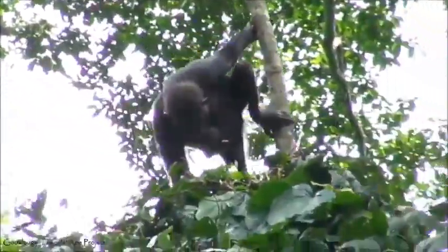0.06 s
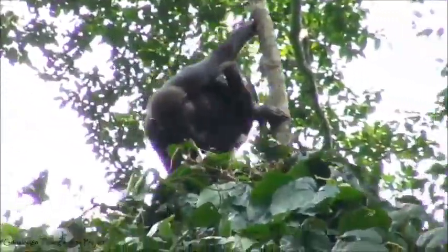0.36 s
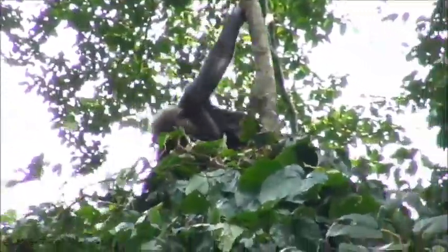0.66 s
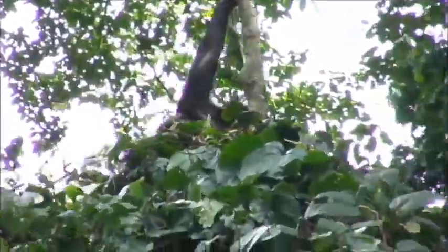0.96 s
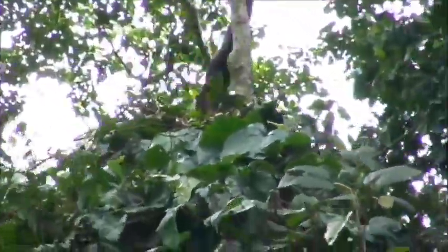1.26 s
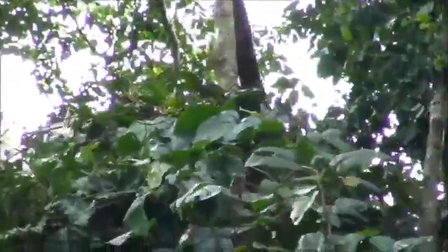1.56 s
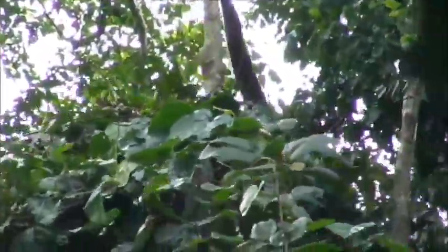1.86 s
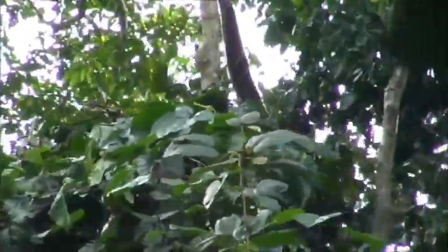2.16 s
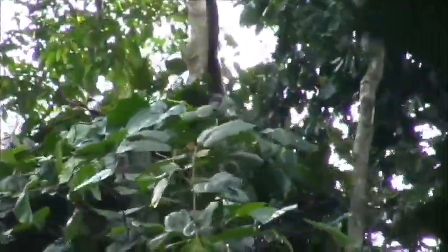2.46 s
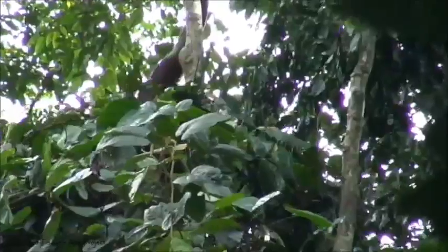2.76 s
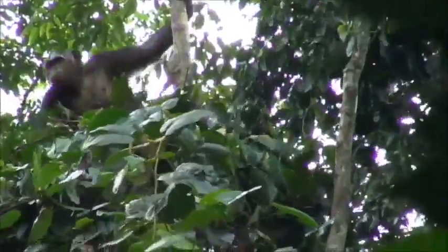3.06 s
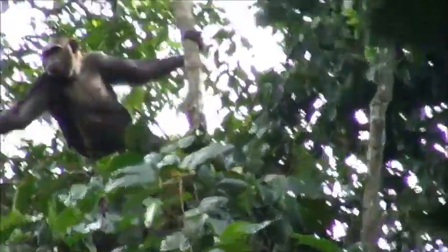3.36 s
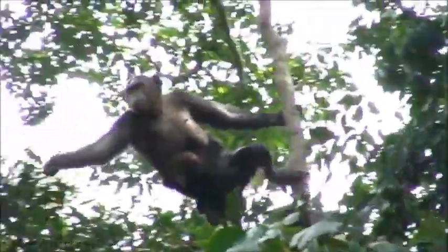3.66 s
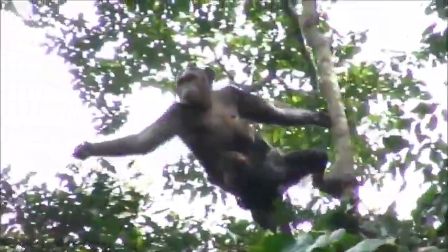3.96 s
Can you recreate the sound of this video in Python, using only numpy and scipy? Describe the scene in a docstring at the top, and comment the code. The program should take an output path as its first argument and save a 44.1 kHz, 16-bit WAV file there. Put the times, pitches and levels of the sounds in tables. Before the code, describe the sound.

A dense, high insect chorus shrills all around the microphone in a rainforest. Crickets trill close on the right, a climbing ape faintly rustles leaves and snaps twigs, and a distant bird calls a few falling notes.

```python
"""Under the rainforest canopy

A dense chorus of insects shrills all round the microphone near 7.5 kHz, over the soft wash of the forest.
Two crickets trill with their wings close by on the right, and a third chirps behind them. Off to the left
are a thin whistle and a low purring trill; a far bird gives falling notes. An ape climbs through the
branches, stirring leaves, making boughs knock and snapping a few twigs."""
import sys
import numpy as np
from scipy import signal
from scipy.fft import rfft, irfft
from scipy.io import wavfile
from scipy.ndimage import uniform_filter1d

SR = 44100
rng = np.random.default_rng(int(sys.argv[2]) if len(sys.argv) > 2 else 0)


def master_out(mix):
    """Clip the mix to full scale and print it as 16-bit PCM to the path in sys.argv[1]."""
    frames = np.transpose(np.atleast_2d(mix))
    ceiling = np.clip(frames, -1, 1)
    pcm = np.round(ceiling * 32767).astype(np.int16)
    wavfile.write(sys.argv[1], SR, pcm)


N = 176400

# Spectrum of rustling leaves. Each row: frequency in Hz, relative level in dB.
LEAF_SPECTRUM = [(500, -12), (2000, -4), (4000, 2.5), (8000, -7), (12000, -6.5), (16000, -21)]


def undb(db):
    """Decibels to gain."""
    return 10 ** (np.asarray(db) / 20)


def unit(x):
    """Scale to rms 1."""
    return x / np.sqrt(np.mean(x ** 2) + 1e-20)


def clock():
    """Time of every sample in seconds."""
    return np.arange(N) / SR


def walk(rate_hz):
    """Smooth random wander of rms 1."""
    window = max(int(SR / rate_hz), 2)
    smoothed = uniform_filter1d(rng.standard_normal(N), window, mode="wrap")
    return unit(uniform_filter1d(smoothed, window, mode="wrap"))


def swell(t, middle, width):
    """A bell-shaped rise and fall."""
    return np.exp(-((t - middle) / width) ** 2)


def strike(t, start, decay):
    """A sudden onset that dies away exponentially."""
    return (t >= start) * np.exp(-np.abs(t - start) / decay)


def bin_hz():
    """Frequency of every spectral bin, at least 1 Hz."""
    return np.maximum(np.fft.rfftfreq(N, 1 / SR), 1)


def across_bins(points):
    """Join (Hz, value) points along a logarithmic frequency axis."""
    hz, values = np.array(points).T
    return np.interp(np.log(bin_hz()), np.log(hz), values)


def colour(x, spectrum):
    """Filter by a spectrum of (Hz, dB) points; rms 1."""
    return unit(irfft(rfft(x) * undb(across_bins(spectrum)), N))


def tone(hz):
    """A sine of rms 1 on a pitch curve."""
    return np.sqrt(2) * np.sin(2 * np.pi * np.cumsum(hz) / SR)


def pan(left_db):
    """Constant-power gains that put the left channel left_db above the right."""
    return unit(undb(np.array([[left_db], [-left_db]]) / 2))


def spread(pair, likeness):
    """Mix two unrelated signals into left and right channels whose correlation is likeness."""
    mid = np.sqrt(1 + likeness) * pair[0]
    side = np.sqrt(1 - likeness) * pair[1]
    return np.array([mid + side, mid - side]) / np.sqrt(2)


def forest(x, wet_db, t60_s=.48):
    """Sound reaches the microphone directly and as a diffuse tail scattered by trunks and leaves."""
    t = np.arange(SR) / SR
    tail = rng.standard_normal((2, SR)) * np.exp(-np.log(1000) * t / t60_s)
    tail /= np.sqrt(np.sum(tail ** 2, axis=1, keepdims=True))
    padded = np.pad(x, (SR, 0), mode="reflect")  # the forest is already ringing at the start
    wet = signal.fftconvolve(padded[None], tail, axes=1)[:, SR:SR + N]
    return (x + undb(wet_db) * wet) / np.hypot(1, undb(wet_db))


def wash(level_db=-49.5, waver_db=.5):
    """The soft, wide noise of the distant forest, leaning left in the low mids and right in the treble."""
    # Colour of the wash. Each row: frequency in Hz, relative level in dB.
    spectrum = [(20, -37), (42, -10.5), (70, -7.5), (120, -4), (200, -0.5), (350, 0), (560, 1), (750, -1),
                (950, 4.5), (1300, -2), (2000, -1), (2700, -5.5), (3600, -8), (5200, -11), (10000, -21),
                (14000, -26), (16000, -50)]
    # Its width. Each row: frequency in Hz, correlation of left and right.
    likeness = [(30, .4), (80, .1), (250, 0.12), (550, 0.24), (1100, 0.13), (2500, 0.23), (14000, 0.38)]
    # Its lean. Each row: frequency in Hz, left over right in dB.
    lean = [(80, -1), (250, 1.5), (700, 1), (1400, 1.5), (2500, -2.5), (6000, -0.5), (14000, -1)]
    lean_db = across_bins(lean)
    air = spread(rfft(rng.standard_normal((2, N))), across_bins(likeness))
    air *= undb(np.array([lean_db, -lean_db]) / 2)
    return colour(irfft(air, N), spectrum) * undb(level_db + waver_db * walk(6.2))


def singers():
    """Single voices each hold one thin, slightly wandering note; the clearest whistles on the left."""
    # Held notes. Each row: pitch in Hz, level in dB, left over right in dB, pitch wander in Hz,
    # scattered over direct sound in dB.
    voices = [(1148, -59, 11, 1.8, -11), (1052, -67, 8, 5, -2), (7468, -58, 0, 6, 0), (2185, -73, -5, 9, 0)]
    return sum(forest(tone(hz + wander_hz * walk(25.4)), wet_db) * undb(db) * pan(left_db)
               for hz, db, left_db, wander_hz, wet_db in voices)


def purr(pitch_hz=999, rasp_hz=39.04, pulse_hz=30, pip_width_s=.0051):
    """A low trill far off to the left, perhaps a frog: uneven pulses with a few louder pips."""
    # Loudness of the trill. Each row: time in seconds, level in dB.
    levels = [(0, -70), (.9, -67), (1.5, -57), (2.1, -60), (2.85, -58.5), (3.3, -66.5), (3.7, -58),
              (4, -58)]
    # Pips that stand out of it. Each row: middle in seconds, level in dB.
    loud_pips = [(1.52, -49), (2.0, -49), (2.096, -51), (2.832, -42)]
    t = clock()
    pulses = unit(np.sin(np.pi * (t * pulse_hz + .076 * walk(6.7))) ** 4)
    pulses *= unit(undb(2.3 * walk(27)))
    pulses *= undb(np.interp(t, *np.array(levels).T))
    pips = sum(undb(db) * swell(t, at, pip_width_s) for at, db in loud_pips)
    voice = (pulses + pips) * tone(pitch_hz + rasp_hz * walk(80.5))
    return forest(voice, wet_db=-10) * pan(left_db=12.5)


def bird():
    """Short, rough falling notes, blurred by their long way through the trees."""
    # The calls. Each row: start and length in seconds, first and last pitch in Hz, level in dB,
    # rough pitch spread in Hz.
    notes = [(1.14, .07, 4060, 3580, -56, 330), (1.263, 0.049, 3290, 3140, -53, 131),
             (2.889, 0.072, 3300, 3170, -57, 129), (3.118, 0.064, 4430, 3480, -51.5, 226),
             (3.18, 0.08, 4200, 3720, -55, 281), (3.263, .065, 3600, 3240, -51.5, 150),
             (3.323, 0.072, 3195, 3110, -53.5, 110)]
    t, out = clock(), np.zeros(N)
    for start, length, first_hz, last_hz, db, rasp_hz in notes:
        progress = np.clip((t - start) / length, 0, 1)
        arch = np.sqrt(2) * np.sin(np.pi * progress)
        hz = first_hz + (last_hz - first_hz) * progress
        out += undb(db) * arch * tone(hz + rasp_hz * walk(1200))
    return forest(out, wet_db=0, t60_s=.7)


def far_cricket(pitch_hz=6660, rasp_hz=100, width_s=.046, gain_db=-1):
    """Soft raspy chirps, nearly four a second, farther back and a little to the left."""
    # The chirps. Each row: middle in seconds, relative level in dB.
    chirps = [(.17, -53), (.49, -51), (.745, -48), (1.03, -51), (1.31, -50), (1.59, -55), (1.875, -50),
              (2.125, -58), (2.4, -51), (2.675, -50), (2.93, -51), (3.18, -49), (3.44, -61), (3.71, -52),
              (3.98, -51)]
    t = clock()
    envelope = sum(undb(db + gain_db) * swell(t, at, width_s) for at, db in chirps)
    return forest(envelope * tone(pitch_hz + rasp_hz * walk(500)), wet_db=-4) * pan(left_db=3)


def foliage(flutter_db=2, grains_per_s=6000):
    """Bent branches swish straight ahead, and their leaves crackle in tiny grains."""
    # Branch movements. Each row: middle and width in seconds, swish level and crackle level in dB.
    swishes = [(.1, .04, -62, -76), (.6, 0.24, -53.5, -62), (1.0, 0.033, -60, -57),
               (1.13, 0.039, -52.5, -68), (1.265, 0.049, -50.5, -68), (1.66, 0.016, -56, -58),
               (3.18, 0.12, -55.5, -57), (3.42, 0.13, -57, -59), (3.91, 0.072, -57, -55.5)]
    # Colour of a swish. Each row: frequency in Hz, relative level in dB.
    branch_spectrum = [(80, -39), (250, -8), (450, -2), (900, 0), (1800, -2.5), (3000, -6.5), (6000, -17),
                       (15000, -56)]
    t = clock()
    swish = colour(spread(rng.standard_normal((2, N)), likeness=1), branch_spectrum)
    swish *= unit(undb(flutter_db * walk(120)))
    grains = rng.standard_normal((2, N)) * (rng.random((2, N)) < grains_per_s / SR)
    grains *= undb(1.9 * np.minimum(rng.exponential(size=(2, N)), 2))  # some grains stand out
    crackle = colour(spread(grains, likeness=1), LEAF_SPECTRUM)
    return sum(swell(t, at, width) * (undb(swish_db) * swish + undb(crackle_db) * crackle)
               for at, width, swish_db, crackle_db in swishes)


def leaf_ticks(decay_s=.0034):
    """Single stiff leaves flick against each other: crisp, bright ticks."""
    # The flicks. Each row: start in seconds, level in dB.
    flicks = [(.603, -52), (.665, -51), (.701, -55), (.983, -47), (.992, -50), (1.655, -53)]
    t = clock()
    envelope = sum(undb(db) * strike(t, at, decay_s) for at, db in flicks)
    return forest(envelope * colour(rng.standard_normal(N), LEAF_SPECTRUM), wet_db=-7)


def boughs(decay_s=.027, waver_hz=26.1):
    """Left of centre, wood gives soft hollow knocks under the climber's weight."""
    # The knocks. Each row: start in seconds, level in dB, pitch in Hz.
    knocks = [(0.431, -53, 420), (0.55, -49, 425), (0.759, -54, 420), (1.04, -52, 560), (1.238, -48.5, 440),
              (3.154, -50.5, 570)]
    t = clock()
    wood = sum(undb(db) * strike(t, at, decay_s) * tone(hz + waver_hz * walk(159))
               for at, db, hz in knocks)
    return forest(wood, wet_db=-6) * pan(left_db=6)


def twigs(width_octaves=1.0):
    """Each snapping twig is a quickly dying burst in a broad wood resonance."""
    # The snaps. Each row: start in seconds, level in dB, resonance in Hz, decay in seconds.
    snaps = [(.081, -50, 2200, .008), (.681, -47, 1900, .004), (1.284, -49, 1900, .007),
             (3.105, -46, 1900, .004), (3.154, -40, 1300, .006), (3.176, -45, 1400, .005),
             (3.367, -35.5, 1700, .0045)]
    t, out = clock(), np.zeros(N)
    for at, db, hz, decay in snaps:
        resonance = 1 / (1 + (np.log2(bin_hz() / hz) / width_octaves) ** 2) ** 2
        wood = unit(irfft(rfft(rng.standard_normal(N)) * resonance, N))
        out += undb(db) * wood * strike(t, at, decay)
    return forest(out, wet_db=-9)


def near_crickets(stroke_hz=50, sag_hz=50, rasp_hz=85, uneven_db=1.5, flutter_db=2.4, release_s=.01):
    """Close on the right, each wing stroke sags in pitch; rough trills flutter and run together."""
    # Trills of two crickets. Each row: start and length in seconds, first and last pitch in Hz,
    # level in dB, rise in seconds, roughness from 0 to 1.
    trills = [(-.1, .535, 6020, 6022, -52.3, .05, .75), (1.805, .555, 5898, 5905, -53, .17, .3),
              (2.986, .03, 5890, 5890, -55.5, .005, .25), (3.03, .135, 5895, 5900, -53, .05, .25),
              (3.178, .5, 5898, 5908, -53.5, .02, .35), (3.39, .3, 5985, 6015, -55.5, .07, .75),
              (3.733, .35, 5900, 5940, -55.5, .01, .4), (3.79, .29, 6000, 6025, -57.5, .08, .9)]
    t, out = clock(), np.zeros(N)
    for start, length, first_hz, last_hz, db, rise, rough in trills:
        stroke_phase = ((t - start) * stroke_hz + .04 * walk(22)) % 1
        strokes = unit(np.abs(np.sin(np.pi * stroke_phase)) ** 1.2 + rough ** 2)
        flutter = unit(undb(uneven_db * walk(65) + rough * flutter_db * walk(130)))
        attack = np.interp(t, [start, start + rise], [.3, 1], left=0)
        release = np.clip((start + length - t) / release_s, 0, 1)
        glide_hz = np.interp(t, [start, start + length], [first_hz, last_hz])
        hz = glide_hz - sag_hz * (stroke_phase - .5) + rough * rasp_hz * walk(1200)
        out += undb(db) * attack * release * strokes * flutter * tone(hz)
    return forest(out, wet_db=-12) * pan(left_db=-10)


def swarm(count=30, middle_rate_hz=150.64, jitter=.16):
    """Many insects, each clicking at its own uneven rate within an octave of the middle rate."""
    out = np.zeros(N)
    for speed, size, start_phase in rng.random((count, 3)):
        rate_hz = middle_rate_hz * 2 ** (2 * speed - 1) * (1 + jitter * walk(150))
        phase = start_phase + np.cumsum(rate_hz) / SR
        clicks = np.diff(np.floor(phase), prepend=0)  # one click per cycle
        out += clicks * (.5 + size) * undb(2 * walk(23))
    return out - out.mean()


def chorus(level_db=-42, hiss_db=-.5, waver_db=.33, fade_db_per_s=.22):
    """All round, the swarm's clicks ring a shared wing resonance; farther insects blur into a hiss."""
    # Resonance of the wings. Each row: frequency in Hz, relative level in dB.
    wing_spectrum = [(5500, -32.5), (6200, -18.5), (6600, -14), (6900, -9), (7200, -0.5), (7450, -1),
                     (7750, -1.5), (8100, -7.5), (8500, -16.5), (9000, -23.5), (10000, -29), (12000, -34.5),
                     (15000, -44)]
    groups = [colour(unit(swarm()) + undb(hiss_db) * rng.standard_normal(N), wing_spectrum)
              for _ in range(2)]
    gain = undb(level_db + waver_db * walk(13) - fade_db_per_s * (clock() - 3))
    return spread(groups, likeness=.51) * pan(left_db=-.3) * gain


def scene():
    """The calling animals, the climbing ape and the distant forest meet at the microphone."""
    calls = chorus() + singers() + near_crickets() + far_cricket() + purr() + bird()
    climber = foliage() + leaf_ticks() + boughs() + twigs()
    return calls + climber + wash()


def record(dry):
    """The stereo microphone's chain cuts the treble steeply above 15.5 kHz."""
    return signal.sosfilt(signal.ellip(10, .1, 80, 15500, fs=SR, output="sos"), dry)


dry = scene()
out = record(dry)
master_out(out)
```